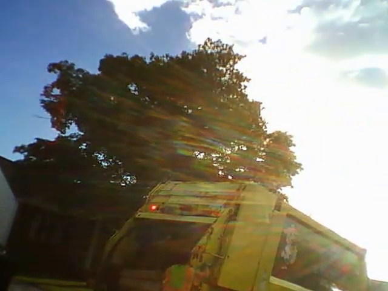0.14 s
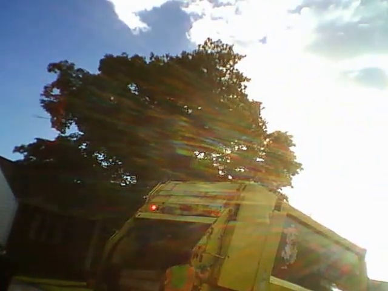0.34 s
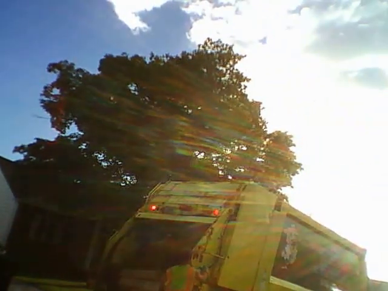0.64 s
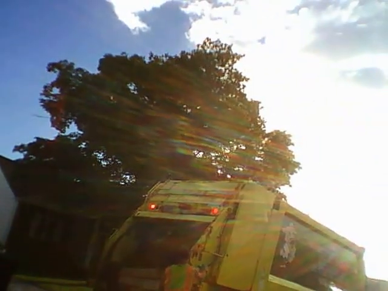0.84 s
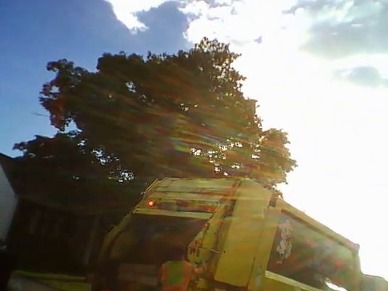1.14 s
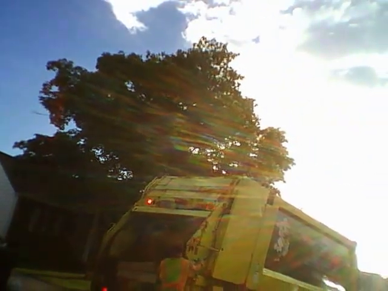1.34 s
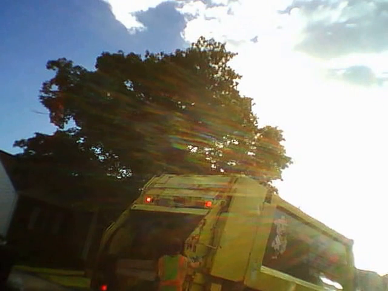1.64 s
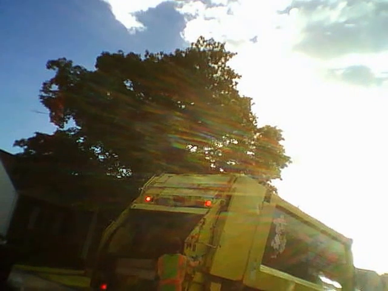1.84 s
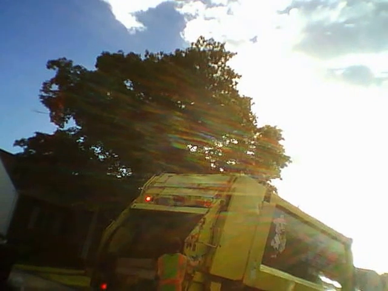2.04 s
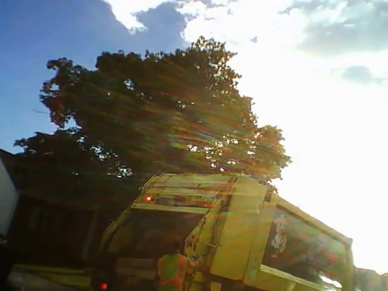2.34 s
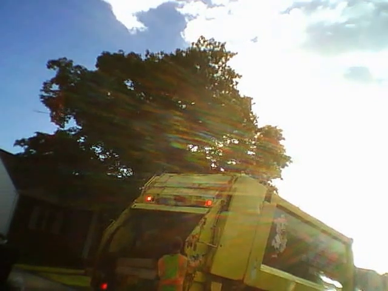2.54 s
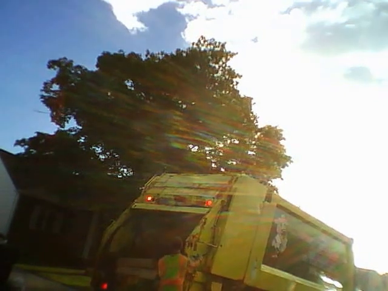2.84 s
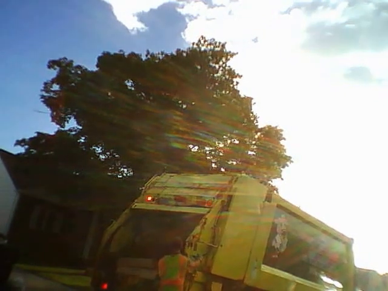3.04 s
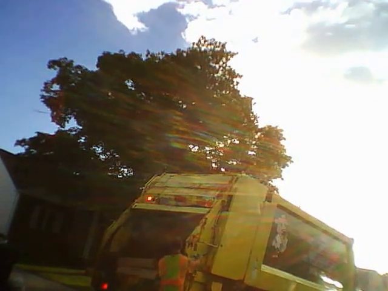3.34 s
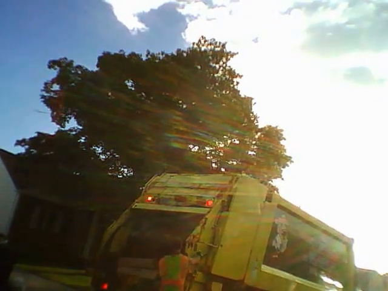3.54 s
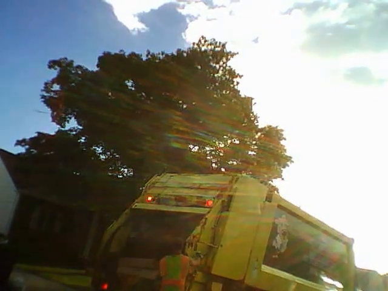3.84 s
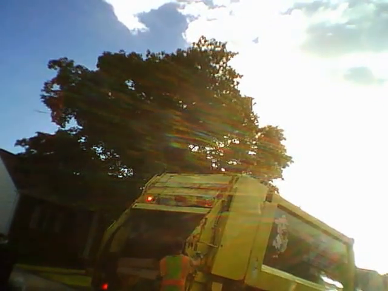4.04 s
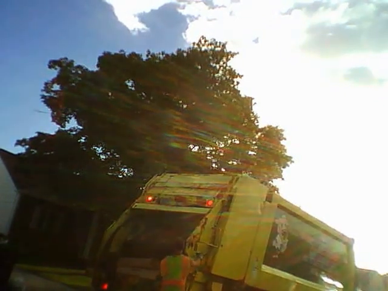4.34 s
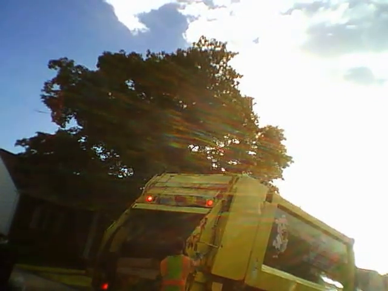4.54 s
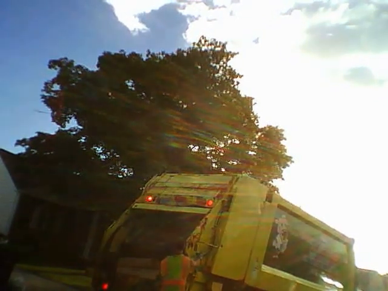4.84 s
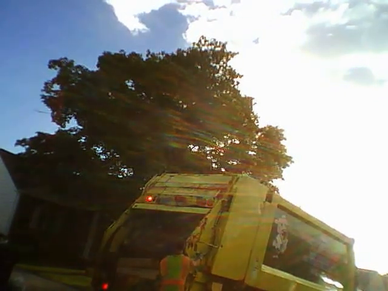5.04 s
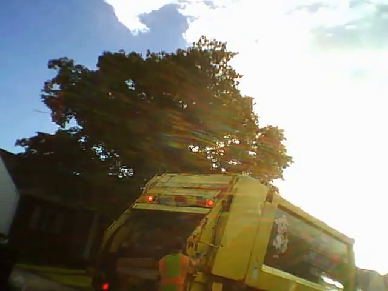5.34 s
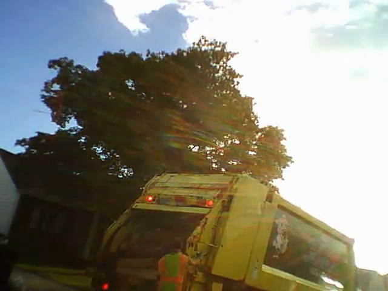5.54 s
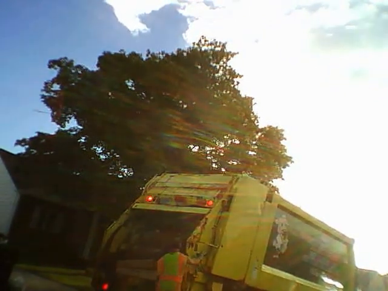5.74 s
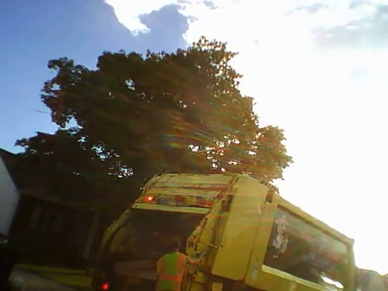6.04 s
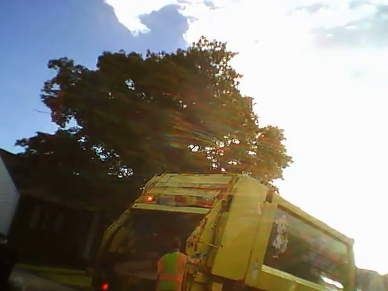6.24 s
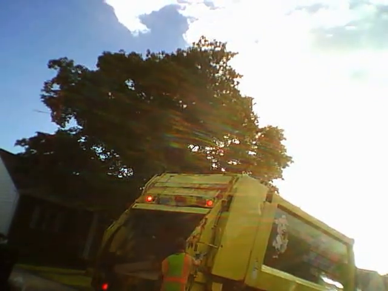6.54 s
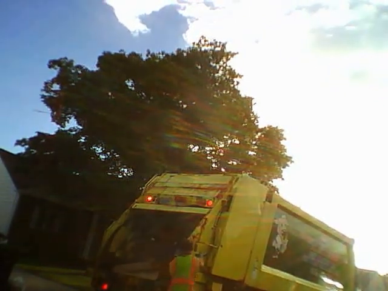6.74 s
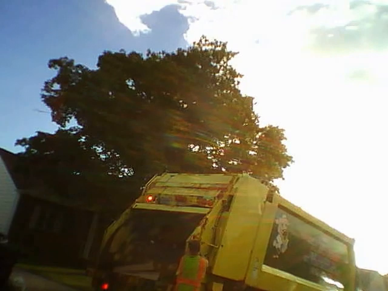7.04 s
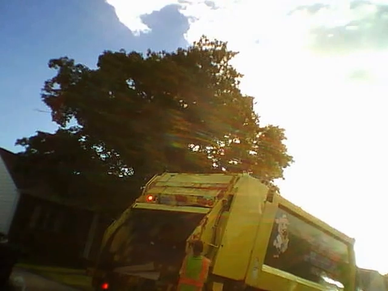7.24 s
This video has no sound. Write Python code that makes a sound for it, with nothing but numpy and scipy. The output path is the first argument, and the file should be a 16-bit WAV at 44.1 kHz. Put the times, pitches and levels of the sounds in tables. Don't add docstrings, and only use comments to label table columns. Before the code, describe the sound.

Outdoors on a street, a garbage truck's diesel roars steadily at raised revs. A swelling dull steel slam comes almost at once, then a hydraulic pump hums and whines. Faint ticks precede a loud, rattling metal crash midway, after which engine and pump continue slightly lower in pitch. A cheap small camera microphone makes everything harsh, gritty, band-limited and smeared, with tones skipping.

```python
import sys
import numpy as np
from scipy import signal
from scipy.fft import rfft, irfft, next_fast_len
from scipy.io import wavfile
from scipy.ndimage import uniform_filter1d, map_coordinates

SR = 44100
rng = np.random.default_rng(int(sys.argv[2]) if len(sys.argv) > 2 else 0)


def elevation(decibels):
    levels = np.asarray(decibels, float)
    return 10 ** (levels / 20)


def transcribe(signal):
    frames = np.atleast_2d(signal).T
    limited = np.clip(frames, -1, 1)
    pcm = np.round(limited * 32767).astype(np.int16)
    wavfile.write(sys.argv[1], SR, pcm)


N = 326340
LONG = N + SR // 4

# (multiple of half crank speed, level before reversal [dB], level after [dB])
EXHAUST_ORDERS = [(3, -12.5, -12.5), (4, 0, -1.5), (5, -7, -13), (6, -9, 2), (7, -7.5, -5.5), (8, -3, 3.5),
                  (9, -26.5, -13.5), (10, -12.5, -12.5), (12, -19, -9)]
# (time [s], frequency [Hz])
HALF_CRANK_SPEED = [(0, 21.7), (3.6, 20.3), (4.1, 19.6), (7.4, 19.7)]
# (frequency [Hz], level [dB])
ROAR_SPECTRUM = [(15, -22.5), (40, -21), (70, -22.5), (110, -15), (240, -11.5), (400, -16), (640, -13.5),
                 (790, -18), (1000, -15.5), (1460, -17), (2000, -17), (3000, -20), (3800, -18.5),
                 (4400, -35.5)]
# (frequency [Hz], width [Hz], level [dB])
BODY_PANELS = [(676, 330, -16.5), (1240, 190, -6.5), (1680, 56, -3), (2607, 160, -7.5), (3260, 400, -4.5)]

# (start [s], gap [s], first level [dB], change per blow [dB], brightness [Hz])
BLOW_RUNS = [
    (0.059, 0.0055, -3.5, 0.74, 745),
    (3.5916, 0.003, 5, -2, 1600),
    (4.322, .0028, -3, -0.4, 3050),
]
# (time [s], level [dB])
SETTLING_BLOWS = [
    (0.109, -4.5),
    (0.123, -2.5),
    (0.134, -10),
    (3.678, -4),
    (3.716, -8.5),
    (3.749, -5.5),
]
# (time [s], level [dB])
RATTLING_BLOWS = [(3.622, 2), (3.645, -2.5), (3.676, 0.5), (3.684, 2), (3.689, 0.5), (3.706, -2),
                  (3.721, -1.5), (3.735, -3.5), (3.761, -2), (3.8, -8), (3.855, -7.5), (3.967, -9)]
# (time [s], level [dB])
TICKING_BLOWS = [
    (1.523, -3),
    (1.5444, -0.5),
    (3.4446, -1.5),
    (3.45, -4),
]
# (brightness [Hz], decay t60 [s], thud level [dB])
BLOW_KINDS = [
    (600, 0.058, -6),
    (800, 0.12, -24),
    (1900, .035, -28.5),
]
# (frequency [Hz], level [dB], decay t60 [s])
HOPPER_MODES = [(560, -2, .05), (720, -3, .06), (1020, -2, .06), (1230, 0, .05), (1690, -4, .045),
                (2120, -1, .045), (2330, -3, .04), (2780, -5, .04), (3300, -6, .035)]
# (frequency [Hz], level [dB], decay t60 [s])
FRAME_MODES = [(129, -4, 0.34), (212, -5.5, 0.041), (350, -4, 0.067)]

# (time [s], hum level [dB], whine level [dB])
PUMP_STROKES = [
    [(0.16, -20.5, -24), (0.3, -17, -29.5), (0.6, -15, -26), (1.9, -16, -25), (2.5, -13.5, -27),
     (3.59, -14.5, -30.5)],
    [(3.79, -19, -26), (3.85, -16.5, -27), (4.12, -20, -22.5), (4.55, -16, -27.5), (5.3, -15.5, -24),
     (6.0, -16, -24.5), (6.9, -17, -25), (7.07, -18.5, -25.5), (7.4, -15.5, -25)],
]
PUMP_HUM = [314.9, 299]
# (frequency [Hz], level [dB])
PIPE_WHINES = [
    [(909, -11), (1050, -10), (1623, 3), (2545, -4), (2730, -11.5), (3241, -12.5), (3451, -1), (3634, -3.5)],
    [(866, -7.5), (1545, -6), (1730, -0.5), (2815, -9.5), (3273, -25.5), (3460, -7), (3677, -11.5)],
]
# (octave at start [dB], drift [dB/s], high whines at start [dB], drift [dB/s])
PUMP_OVERTONES = [(-31, 0.5, -24, -1), (-27, -5.5, -25.5, 1.2)]
# (frequency [Hz], top level [dB], time of top [s], swell [s], fade [dB/s])
LATE_LINES = [(1945, -30, 6.2, .6, -2.3), (1080, -32.5, 6.4, 1.3, 22)]

# (time [s], depth [dB])
GAIN_DUCKS = [
    (0.102, 2.5),
    (3.606, 5.5),
    (3.699, 5),
]
# (from [s], to [s])
KEEPING_PACE = [(1.53, 2.11), (4.95, 5), (6.35, 7.01)]
# (frequency [Hz], level [dB])
IMAGE_LEAK = [(2500, 0), (3500, -5), (4000, -5), (4370, -15.5), (4550, -21.5), (4800, -30), (5000, -40.5),
              (5200, -53.5), (5350, -120)]
# (frequency [Hz], level [dB])
HISS_SPECTRUM = [(5600, -29.5), (6400, -10.5), (8000, 3.5), (10300, -5.5), (12500, -2.5), (14500, -3),
                 (16000, -24.5)]

REVERSAL_S = 3.6
RATE_HZ = 8000


def noise():
    return rng.standard_normal(LONG)


def unit(x):
    return x / np.sqrt(np.mean(x ** 2))


def band(x, hz, width_hz):
    return signal.lfilter(*signal.iirpeak(hz, hz / width_hz, fs=SR), x)


def colour(x, points):
    size = next_fast_len(len(x))
    hz, db = np.transpose(points)
    f = np.maximum(np.arange(size // 2 + 1) * SR / size, 1)
    gain = elevation(np.interp(np.log(f), np.log(hz), db))
    return irfft(rfft(x, size) * gain, size)[:len(x)]


def walk(rate):
    k = int(SR / rate)
    held = np.repeat(rng.standard_normal(LONG // k + 1), k)
    return 1.3 * uniform_filter1d(uniform_filter1d(held, k), k)[:LONG]


def tone(hz, wander_hz, skirt_db):
    phase = np.cumsum(hz + wander_hz * walk(30)) / SR + rng.random()
    flow = 1 + elevation(skirt_db) * walk(90)
    return np.sqrt(2) * flow * np.sin(2 * np.pi * phase)


def ring(modes, stretch, t):
    hz, db, t60 = np.transpose(modes)[:, :, None]
    return np.sum(elevation(db - 60 * t / t60) * np.sin(2 * np.pi * hz * stretch * t), axis=0)


def diesel(clock):
    shaft_hz = np.interp(clock, *np.transpose(HALF_CRANK_SPEED)) * (1 + .004 * walk(3))
    shaft = np.cumsum(shaft_hz) / SR
    after = np.clip((clock - REVERSAL_S) / 0.24, 0, 1)
    exhaust = 0
    for order, before_db, after_db in EXHAUST_ORDERS:
        level = elevation(before_db + (after_db - before_db) * after + 2.0 * walk(6.5))
        exhaust = exhaust + level * np.sin(2 * np.pi * (order * shaft + rng.random()))
    exhaust_db = -27.5 + 0.42 * np.maximum(clock - REVERSAL_S, 0)

    knock = noise() * (1 + .5 * np.exp(-(3 * shaft % 1) / 0.048))
    panels = sum(elevation(db + 1.2 * walk(3.7)) * band(knock, hz, width) for hz, width, db in BODY_PANELS)
    rumble = elevation(1.2 * walk(8)) * signal.lfilter(*signal.butter(1, 400, fs=SR), noise())
    clatter = signal.lfilter(*signal.butter(1, 400, "high", fs=SR), knock)
    roar = unit(colour(clatter + rumble + panels, ROAR_SPECTRUM))
    return elevation(-15) * roar + elevation(exhaust_db) * exhaust


def blow_list():
    count = 9
    k = np.arange(count)
    rows = []
    for start, gap, first_db, change_db, hz in BLOW_RUNS:
        times = start + gap * (k + .5 * rng.random(count))
        levels = first_db + change_db * k + 0.5 * rng.standard_normal(count)
        rows += [(s, db, hz, 0.057, -19) for s, db in zip(times, levels)]
    for blows_of_kind, kind in zip((SETTLING_BLOWS, RATTLING_BLOWS, TICKING_BLOWS), BLOW_KINDS):
        rows += [(*row, *kind) for row in blows_of_kind]
    return rows


def steel_blow(hz, t60, thud_db, t):
    fade = elevation(-60 * t / np.clip(t60, .01, .4)) + .5 * np.exp(-t / .002)
    crack = band(rng.standard_normal(len(t)), hz, 1.7 * hz) * fade
    stretch = 1 + 0.068 * rng.standard_normal()
    plates = band(ring(HOPPER_MODES, stretch, t), hz, 0.79 * hz)
    thud = elevation(thud_db) * ring(FRAME_MODES, 1, t)
    return crack / np.max(abs(crack)) + elevation(-10) * plates / np.max(abs(plates)) + thud


def blows(kept):
    out, t = np.zeros(LONG + SR), np.arange(SR // 2) / SR
    for s, db, hz, t60, thud_db in blow_list():
        start = kept[int(s * SR)]
        out[start:start + len(t)] += elevation(db + 2.0) * steel_blow(hz, t60, thud_db, t)
    return colour(out[:LONG], [(20, -11.5), (90, 4.5), (3000, -4.0), (5000, -9.0)])


def pump(clock):
    out = 0
    for rows, hum_hz, lines, overtones in zip(PUMP_STROKES, PUMP_HUM, PIPE_WHINES, PUMP_OVERTONES):
        octave_db, octave_drift, high_db, high_drift = overtones
        s, hum_db, low_db = np.transpose(rows)
        hum = elevation(np.interp(clock, s, hum_db, -99, -99))
        low = elevation(np.interp(clock, s, low_db, -99, -99))
        on, since = (clock > s[0]) & (clock <= s[-1]), clock - s[0]
        octave = on * elevation(octave_db + octave_drift * since + 0.83 * walk(4))
        pressure = np.minimum(since / 0.4, 1)
        high = on * pressure * elevation(high_db + high_drift * since)

        phase = 2 * np.pi * np.cumsum(hum_hz + 0.54 * walk(4)) / SR
        wave = hum * (np.sin(phase) + elevation(-15) * np.sin(3 * phase)) + octave * np.sin(2 * phase)
        out = out + np.sqrt(2) * elevation(0.7 * walk(20) + 1.0 * walk(5)) * wave
        for hz, db in lines:
            level = low if hz < 2000 else high
            out = out + level * elevation(db) * tone(hz, .003 * hz, skirt_db=-13.5)
    return out + late_whines(clock)


def late_whines(clock):
    out = 0
    for hz, db, top, swell, fade in LATE_LINES:
        since = clock - top
        shape_db = np.where(since < 0, 24.5 * since / swell, -fade * since)
        out = out + elevation(db + shape_db) * tone(hz, 10.5, skirt_db=-19.5)
    return out


def gain_control(clock):
    attack_s, recovery_db_per_s = 0.066, 6.5
    cuts = []
    for s, depth_db in GAIN_DUCKS:
        since = clock - s
        cuts.append(np.clip(since / attack_s, 0, 1) * np.maximum(depth_db - recovery_db_per_s * since, 0))
    return elevation(-np.max(cuts, axis=0))


def kept_samples():
    buffer_hz, skip_s, splice_s, loss_ms_per_s = 31.0, .0011, .007, 27.5
    edges = (np.arange(int(N / SR * buffer_hz)) + .1) / buffer_hz
    behind = 1 - sum((edges > a) & (edges < b) for a, b in KEEPING_PACE)
    owed = np.cumsum(loss_ms_per_s * behind) / 1000 / buffer_hz
    due = np.floor(owed / skip_s + .3 * rng.standard_normal(len(edges)))
    blocks = np.diff(np.maximum.accumulate(due), prepend=0)
    lost = np.zeros(N)
    lost[(edges * SR).astype(int)] = blocks * skip_s * SR * np.exp(.3 * rng.standard_normal(len(edges)))
    skipped = uniform_filter1d(np.cumsum(lost), int(splice_s * SR), mode="nearest")
    return np.arange(N) + skipped.astype(int)


def scene():
    kept = kept_samples()
    clock = np.interp(np.arange(LONG), kept, np.arange(N) / SR)
    street = gain_control(clock) * (diesel(clock) + blows(kept) + pump(clock))
    low_pass = signal.butter(12, .49 * RATE_HZ, fs=SR, output="sos")
    return signal.sosfilt(low_pass, street[kept])[None]


def top_cut(x):
    return signal.sosfilt(signal.butter(12, 15750, fs=SR, output="sos"), x)


def record(dry):
    slow_times = np.arange(N * RATE_HZ // SR + 1) * SR / RATE_HZ
    slow = map_coordinates(dry[0], [slow_times], order=3, mode="nearest")
    stuffed = np.zeros(2 * len(slow))
    stuffed[::2] = 2 * slow / (1 + np.abs(slow / 1.15) ** 6) ** (1 / 6)
    raised = colour(signal.resample_poly(stuffed, SR, 2 * RATE_HZ)[:N], IMAGE_LEAK)
    hiss = elevation(-78) * colour(rng.standard_normal(N), HISS_SPECTRUM)
    clip, offset = .975, -.003
    mix = np.clip(raised + hiss + offset, -clip, clip)[None]
    return top_cut(mix)


dry = scene()
out = record(dry)
transcribe(out)
```